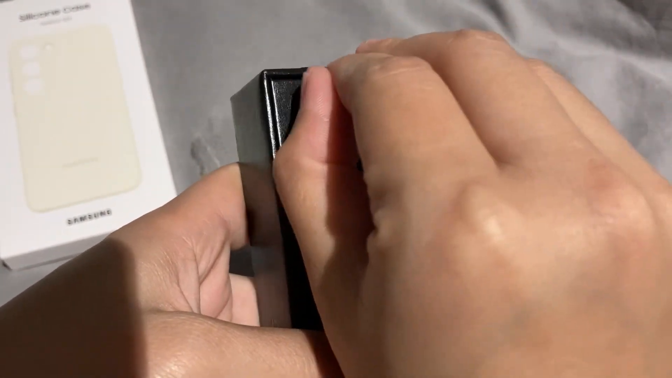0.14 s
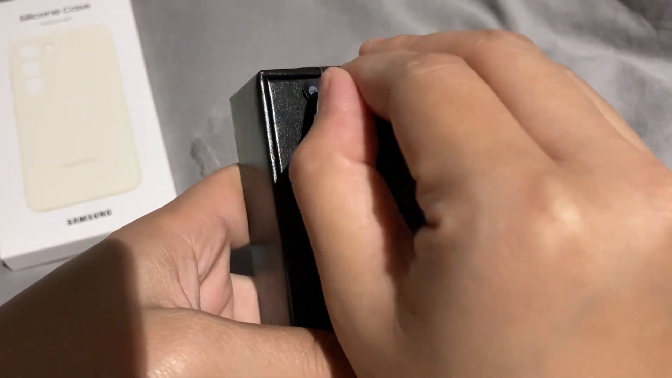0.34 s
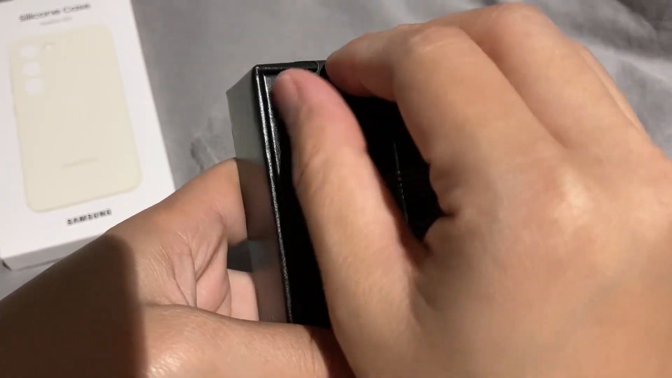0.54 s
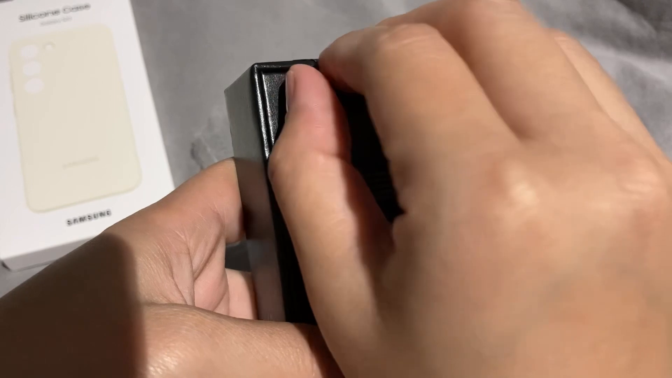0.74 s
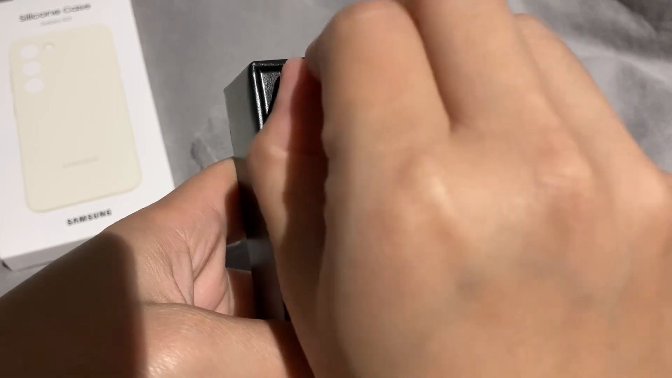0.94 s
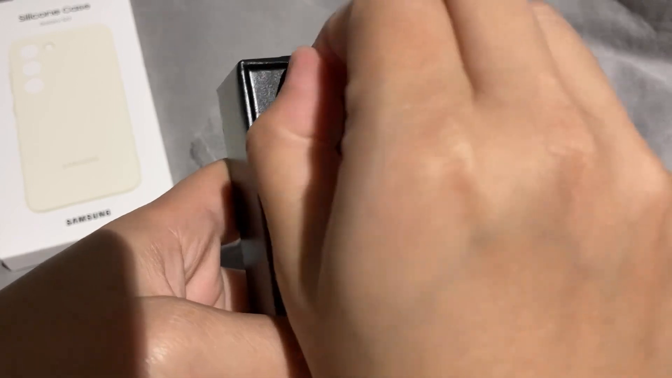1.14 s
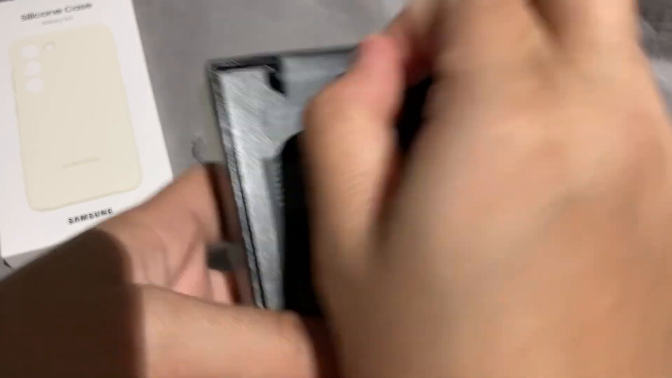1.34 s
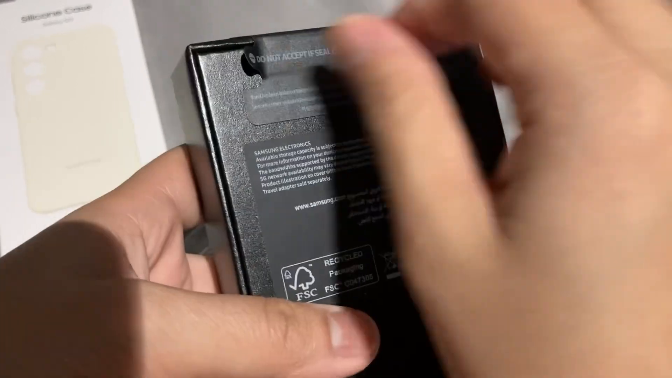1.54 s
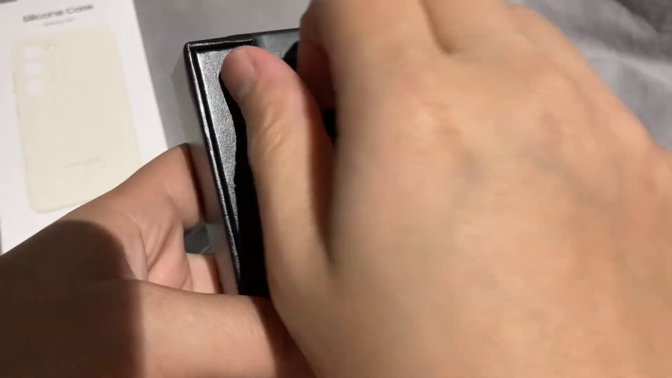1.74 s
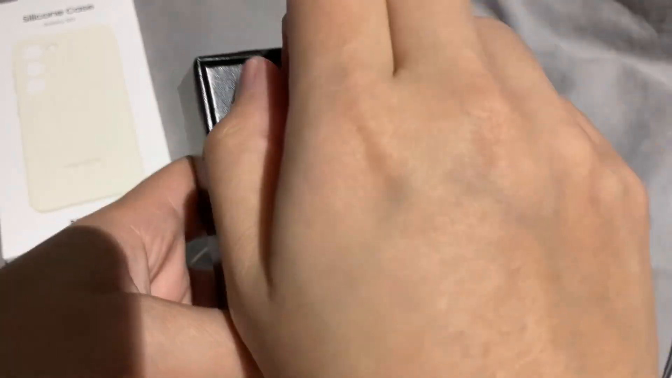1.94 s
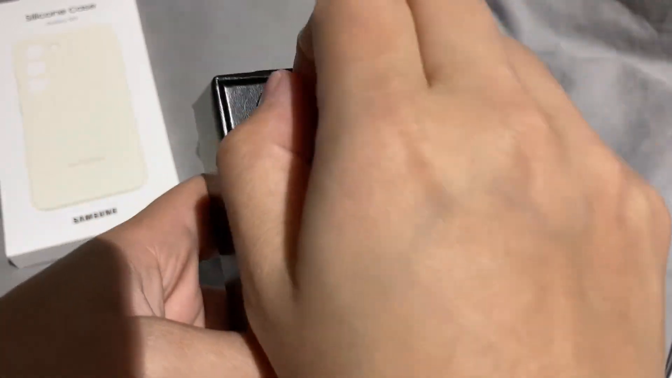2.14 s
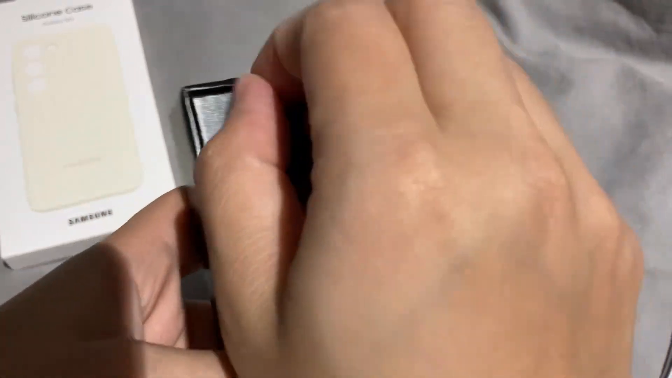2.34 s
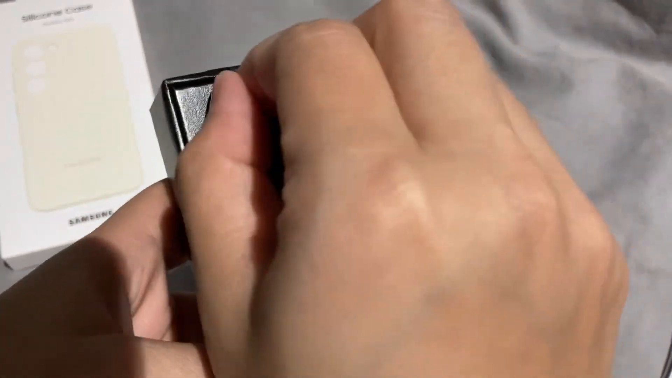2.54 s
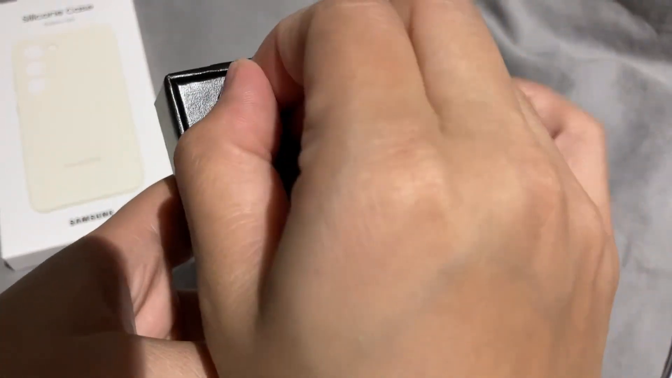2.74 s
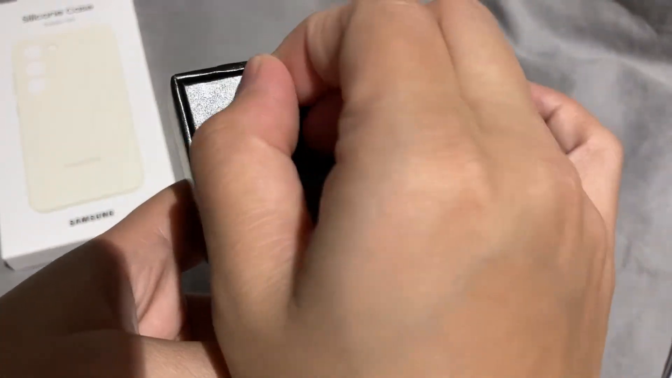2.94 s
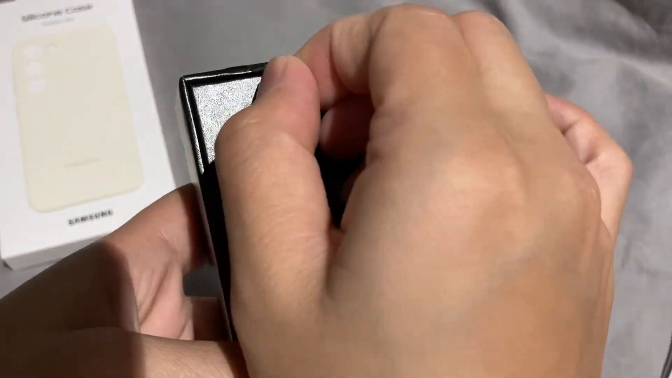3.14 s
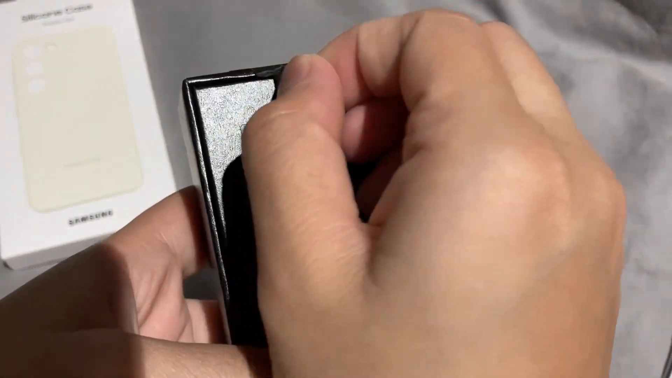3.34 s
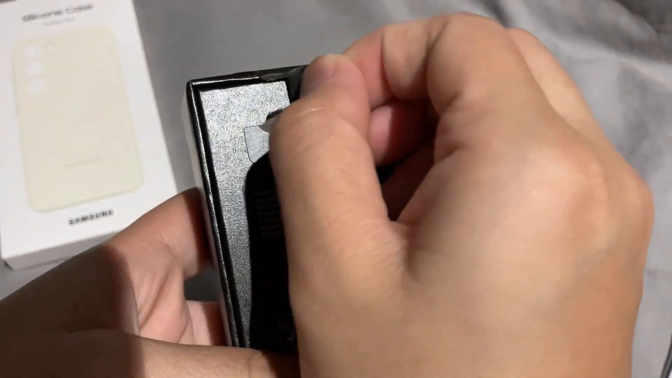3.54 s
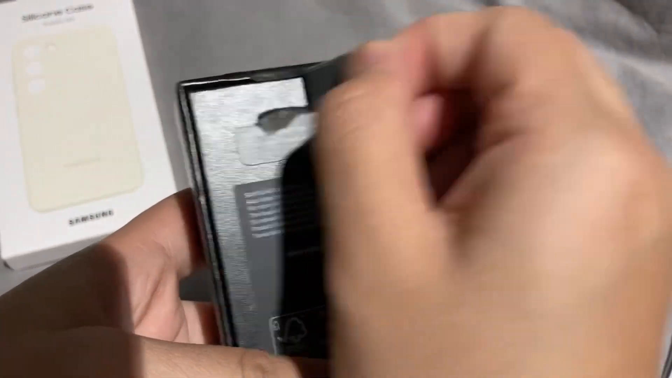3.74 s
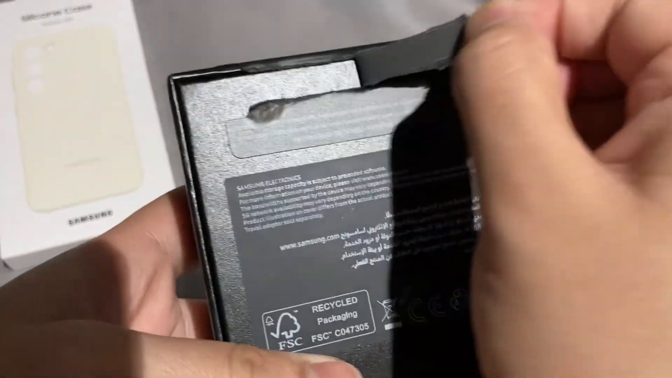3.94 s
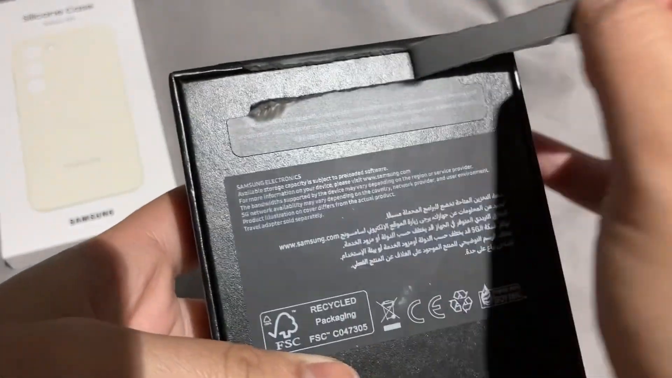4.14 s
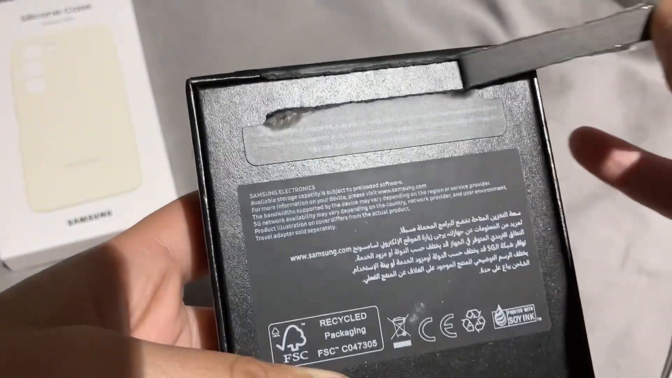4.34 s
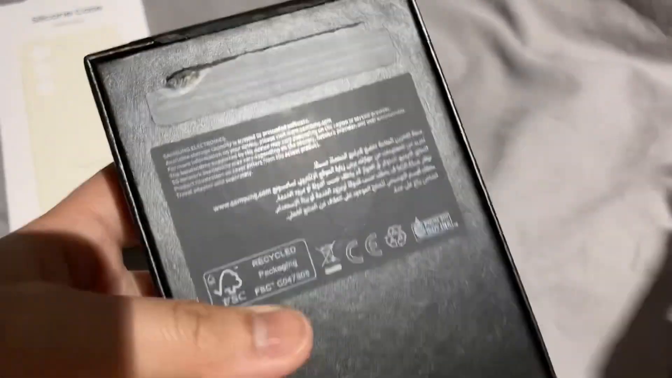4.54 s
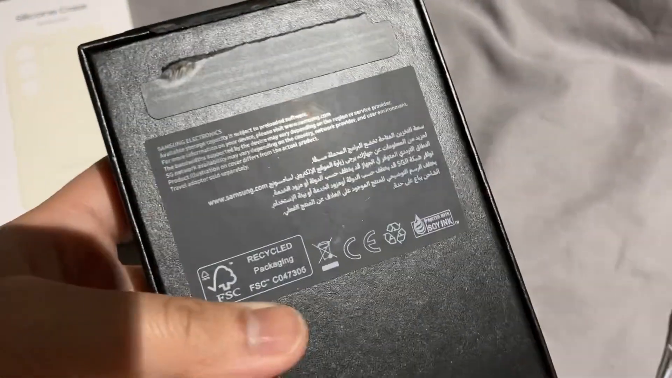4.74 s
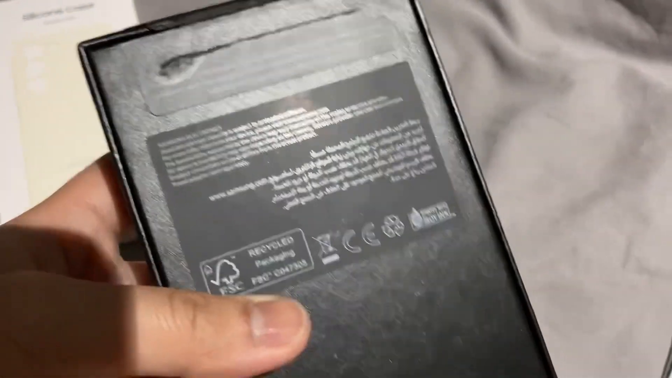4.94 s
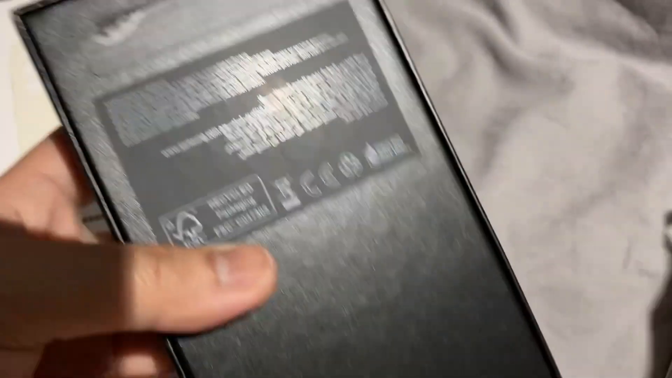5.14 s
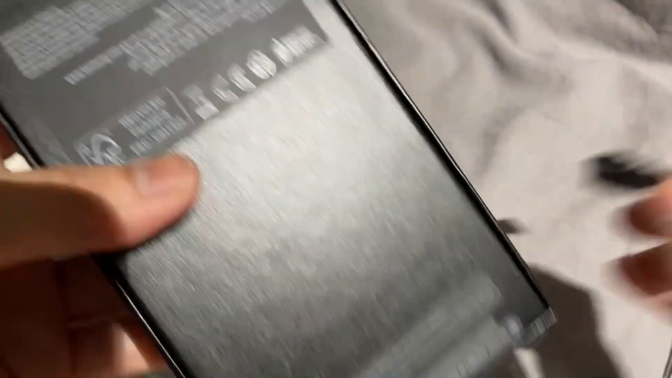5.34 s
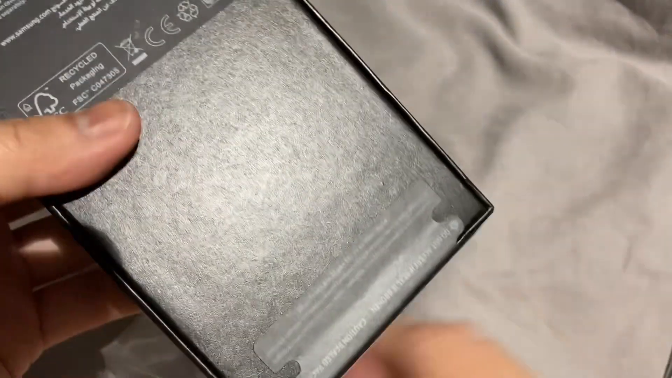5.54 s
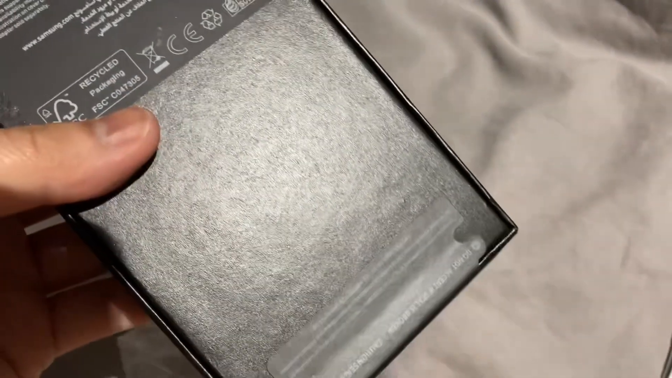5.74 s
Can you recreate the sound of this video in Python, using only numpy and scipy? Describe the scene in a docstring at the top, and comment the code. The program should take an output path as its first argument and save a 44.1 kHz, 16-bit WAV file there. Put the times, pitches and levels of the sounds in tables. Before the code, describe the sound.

Very close stereo capture of hands on a small hollow cardboard box in a quiet furnished room. Faint finger rubs and sharp nail clicks come first, with one solid knock near one second. Picking at a paper seal grows from faint crackle to dense hiss, then a bright rip runs and snaps off. After a pause, fingers tap and brush the card.

```python
"""Opening a sealed cardboard box

Two hands open a small cardboard box close to a pair of microphones in a quiet furnished room.
Fingers tap and slide over the card, pick at the paper seal, then peel it off in one long rip.
The strip snaps free, the hollow box knocks, and a hand brushes along it.
Paper is coloured bursts of noise, the box is damped modes, and the room is a short diffuse tail."""
import sys
import numpy as np
from scipy import signal
from scipy.fft import rfft, irfft
from scipy.io import wavfile
from scipy.ndimage import uniform_filter1d, map_coordinates

SR = 44100
rng = np.random.default_rng(int(sys.argv[2]) if len(sys.argv) > 2 else 0)


def transcribe(signal):
    """Save signal, clipped to [-1, 1], as a 16-bit WAV file at the path in sys.argv[1]."""
    frames = np.atleast_2d(signal).T
    limited = np.clip(frames, -1, 1)
    pcm = np.round(limited * 32767).astype(np.int16)
    wavfile.write(sys.argv[1], SR, pcm)


N = 255339
TIME = np.arange(N) / SR
FREQS = np.fft.rfftfreq(N, 1 / SR)

# The still room's spectrum. Each row: frequency in Hz, relative level in dB per Hz.
ROOM_TONE_SPECTRUM = [(15, -15), (32, -16), (48, 6), (65, -7.5), (120, -8), (200, -19), (320, -26.5),
                      (600, -33), (1500, -40), (5000, -47.5), (10000, -47), (14000, -48.5), (16000, -59)]
ROOM_TONE_DB = -62  # RMS level
# The loudest breaks of paper fibre and flicks of a fingernail.
# Each row: start in seconds, relative energy in dB.
FIBRE_SNAPS = [(0.0702, -44), (0.1802, -1), (1.0844, -23), (1.3005, -11), (1.6127, -35), (1.7469, -34),
               (1.872, -37), (2.6851, -28), (2.7597, -24), (2.7927, -29), (2.8756, -29), (2.919, -26),
               (2.9233, -22), (2.9486, -26), (2.9951, -26), (3.1026, -28), (3.1717, -17), (3.2439, -24),
               (3.2765, -22), (3.3224, -15), (3.3385, -14), (3.4149, -26), (3.4526, -23), (3.4811, -16),
               (3.5042, -15), (3.6127, -14), (3.6851, -20), (3.7021, -5), (3.7153, -9), (3.7274, -11),
               (4.1604, -13), (4.2982, -19), (4.396, -10), (5.5496, -23), (5.6094, -18)]
SNAP_DECAY_S = .00037
# Blows and tugs on the box. Each row: start in seconds, relative energy of the lid in dB,
# relative energy of the whole box in dB, pitch of the lid under the grip in Hz.
BOX_KNOCKS = [(0.071, -41.5, -27, 1437), (0.1812, -26, -15.5, 1570), (1.0852, -7.5, 2.5, 1194),
              (1.136, -23.5, -17, 1100), (1.3002, -15.5, -22, 1100), (1.3127, -17.5, -9, 1012),
              (1.6109, -37, -28, 1300), (1.7473, -35.5, -45.5, 1390), (1.8731, -30.5, -30, 1205),
              (2.892, -11.5, -8.5, 1161), (3.0211, -16, -13.5, 1164), (3.173, -30, -50, 1500),
              (3.7468, -6.5, -6, 1072), (4.1191, -15, -27, 1067), (4.1562, -25, -19, 949),
              (4.2988, -16.5, -22.5, 1074), (4.396, -4.5, -24, 1017), (4.3983, -12.5, -9, 1148),
              (5.5497, -20, -48, 1430), (5.5947, -18.5, -16.5, 1356), (5.6105, -20.5, -49, 1352),
              (5.6404, -25.5, -23, 1485), (5.6553, -27.5, -18.5, 1570)]
# Modes of the stiff lid. Each row: multiple of the lid pitch, relative level in dB, T60 in seconds.
LID_MODES = [(.6, -17.5, 0.033), (.76, -1, 0.026), (.93, 14, 0.012), (1.13, 16.5, 0.011),
             (1.45, -3.5, 0.019), (1.95, -5.5, 0.026)]
# Low modes of the filled box in the hand, before tuning.
# Each row: frequency in Hz, relative level in dB, T60 in seconds.
BOX_MODES = [(145, -21.5, 0.031), (182, 1, 0.056), (259, 7, 0.029), (347, 2, 0.039), (429, -0.5, 0.029),
             (677, 2.5, 0.011)]
# Strokes of a finger over the card. Each row: hardest press in seconds, swell in seconds,
# fade in seconds, relative hiss in dB, relative drumming of the lid in dB.
FINGER_STROKES = [(0.489, 0.015, .03, -74, -79), (0.553, .04, 0.014, -62, -80),
                  (.77, 0.055, .07, -72.5, -82.5), (.87, 0.11, 0.065, -59.5, -94.5),
                  (1.206, 0.084, 0.071, -59.5, -88), (1.299, 0.014, 0.007, -32.5, -47),
                  (1.402, 0.029, 0.041, -55.5, -81), (1.613, 0.0063, 0.027, -57.5, -56),
                  (1.691, 0.061, 0.027, -67.5, -57.5), (1.77, 0.11, 0.037, -70.5, -77),
                  (2.28, 0.085, .06, -63, -79), (2.38, 0.086, .04, -66.5, -98),
                  (2.46, 0.042, 0.044, -71.5, -101), (5.552, 0.0085, 0.041, -48.5, -54),
                  (5.615, 0.035, 0.035, -47, -57.5), (5.646, 0.043, 0.062, -42.5, -56.5),
                  (5.757, 0.096, 0.081, -53, -70)]
STROKE_EDGE_DB = -19.5  # level one swell before and one fade after the hardest press
# Short pulls that work the end of the seal loose. Each row: hardest pull in seconds,
# swell in seconds, fade in seconds, relative hiss in dB.
SEAL_PULLS = [(2.698, 0.014, 0.14, -70), (2.79, 0.05, 0.076, -65.5), (2.965, .14, 0.1, -53.5),
              (3.191, 0.093, 0.036, -50.5), (3.3, 0.21, 0.087, -58), (3.374, 0.11, 0.072, -48.5),
              (3.53, 0.087, 0.2, -44.5), (3.59, 0.045, 0.092, -44.5)]
PULL_EDGE_DB = -15  # level one swell before and one fade after the hardest pull
# The strip running off in one long rip.
# Each row: time in seconds, relative hiss in dB, relative rasp in dB.
LONG_RIP = [(3.72, -41, -59), (3.736, -42.5, -52), (3.78, -40.5, -51), (3.842, -53, -63.5),
            (3.954, -47, -58.5), (4.004, -45.5, -65), (4.104, -45, -50.5), (4.14, -48, -56),
            (4.158, -43, -52.5), (4.266, -54.5, -68), (4.38, -46.5, -55), (4.4, -38, -45)]
RIP_STOP_S = 0.0078  # time constant of the rip's start and stop
# Picking turns into running: start in seconds, end in seconds.
LOOSENING_SPAN = [3.4, 3.75]
# The hands shifting the weight of the box.
# Each row: start in seconds, envelope peak in dB, pitch in Hz.
HAND_BUMPS = [(2.859, -54, 111), (3.045, -50.5, 66.4), (3.801, -51.5, 153), (5.573, -48, 188),
              (5.613, -51.5, 149), (5.656, -53, 71)]

# Colour of a crisp paper break. Each row: frequency in Hz, relative level in dB per Hz.
CRISP_COLOUR = [(200, -31), (1200, -19.5), (2600, -20), (4500, -19), (6000, -12.5), (8300, -4),
                (10000, -5.5), (12000, -4), (15000, -4.5), (17000, -21)]
# Colour of rasping card. Each row: frequency in Hz, relative level in dB per Hz.
RASP_COLOUR = [(1200, -46.5), (2200, -8.5), (3000, 1), (4300, 1.5), (5600, -8), (6800, 2.5), (9000, -8.5)]
# Colour of skin on card. Each row: frequency in Hz, relative level in dB per Hz.
SKIN_COLOUR = [(3000, -32.5), (6000, -22.5), (7200, -6), (8500, -0.5), (10000, -5.5), (12000, -1.5),
               (15300, -8.5), (16200, -22.5)]
# The lid drumming under a sliding finger. Each row: frequency in Hz, relative level in dB per Hz.
DRUMMING_COLOUR = [(100, -22), (250, -15), (600, -22), (900, -11), (1250, 0), (1750, -6), (2500, -17),
                   (5000, -45)]
# Colour of peeling paper's hiss. Each row: frequency in Hz, relative level in dB per Hz.
HISS_COLOUR = [(3000, -29), (6000, -12), (7200, 1.5), (8500, 3), (9500, 0), (11500, 13), (13000, 2.5),
               (15200, 9.5), (16000, -34.5), (17000, -29.5)]
# The hollow box answering the peel. Each row: frequency in Hz, relative level in dB per Hz.
HOLLOW_COLOUR = [(80, 1), (170, -5.5), (350, -5), (550, -1.5), (850, -5.5), (1200, 7), (1600, 3.5),
                 (2000, -0.5), (2700, -20.5), (5000, -33.5)]

# How far the left microphone leads for sound from the box.
# Each row: frequency in Hz, phase in radians.
LEFT_LEAD = [(0, 0), (1200, -.4), (3200, -3.14), (16000, 21.6)]
# Shading between the microphones. Each row: frequency in Hz, left minus right in dB.
LEFT_BALANCE = [(100, -4), (300, -2.5), (600, -7.5), (1100, -10.5), (2000, -3), (4000, -3.5), (8000, 0.05),
                (16000, 0)]
# Decay of the room. Each row: frequency in Hz, T60 in seconds.
ROOM_DECAY = [(150, 0.38), (1000, 0.14), (4000, 0.23), (9000, 0.15), (16000, 0.087)]
EDGE_HZ = 16800


def amp(db):
    """Decibels to gain."""
    return 10 ** (np.asarray(db) / 20)


def unit(x):
    """Scales a short sound to an energy of one."""
    return x / np.sqrt(np.sum(x ** 2) + 1e-20)


def read(points, hz):
    """Reads a table on a logarithmic frequency axis."""
    f, value = np.transpose(points)
    return np.interp(np.log(hz + 1), np.log(f + 1), value)


def add(track, s, sound):
    """Adds a sound to a track at time s."""
    part = track[round(s * SR):][:len(sound)]
    part += sound[:len(part)]


def colour(x, spectrum, size=2048):
    """Causal minimum-phase filter of unit energy with the given spectrum."""
    hz = abs(np.fft.fftfreq(size, 1 / SR))
    log_gain = np.log(amp(read(spectrum, hz)))
    minimum_phase = np.exp(np.conj(signal.hilbert(log_gain)))
    response = np.fft.ifft(minimum_phase).real[:size // 2]
    return signal.oaconvolve(x, unit(response))[:len(x)]


def room_tone():
    """Low rumble common to both microphones, and a faint separate hiss in each."""
    z = rfft(rng.standard_normal((3, N)))
    # share of the power common to both microphones, by frequency in Hz
    same = read([(40, .985), (110, .94), (300, .7), (900, .15)], FREQS)
    mixed = np.sqrt(same) * z[0] + np.sqrt(1 - same) * z[1:]
    tone = irfft(mixed * amp(read(ROOM_TONE_SPECTRUM, FREQS)), N)
    return amp(ROOM_TONE_DB) * tone / tone.std()


def snaps(gain_db, size=1024):
    """Each break is a very short broadband burst with a faint, longer flutter behind it."""
    out, t = np.zeros(N), np.arange(size) / SR
    lead_in = 16  # samples of room for what the flattening spreads ahead of the burst
    flutter = amp(-26) * np.exp(-t / .003)
    envelope = np.exp(-t / SNAP_DECAY_S) + flutter
    for s, db in FIBRE_SNAPS:
        z = rfft(envelope * rng.standard_normal(size))
        # flatten the spectrum, so that the card alone gives the burst its colour
        even = z / np.sqrt(uniform_filter1d(abs(z) ** 2, size=24))
        burst = np.roll(irfft(even), lead_in)
        add(out, s - lead_in / SR, amp(db + gain_db) * unit(colour(burst, CRISP_COLOUR)))
    return out


def ring(modes, t, pitch):
    """Damped modes, their frequencies scaled by pitch."""
    return sum(amp(db - 60 * t / t60) * np.sin(2 * np.pi * f * pitch * t) for f, db, t60 in modes)


def bending(x, delay_s):
    """Bending waves in card travel as the root of frequency, so a knock sweeps downward."""
    # delay_s is the travel time at 1 kHz; taking it off again keeps 1 kHz in place
    phase = 4 * np.pi * delay_s * np.sqrt(FREQS * 1000)
    return irfft(rfft(x) * np.exp(-1j * (phase - 2 * np.pi * FREQS * delay_s)), N)


def knocks(lid_db, box_db, crack_db, box_lag_s, soft_hz, lid_low_hz, box_low_hz):
    """A dry crack at the contact; the lid rings first and the slower bending of the box follows."""
    body, cracks, t = np.zeros(N), np.zeros(N), np.arange(5000) / SR
    # soft contact rounds the attack, and a small panel cannot radiate low notes
    lid_band = signal.butter(2, [lid_low_hz, soft_hz], "bandpass", fs=SR, output="sos")
    box_band = signal.butter(2, [box_low_hz, soft_hz], "bandpass", fs=SR, output="sos")
    box_ring = unit(signal.sosfilt(box_band, ring(BOX_MODES, t, 0.99)))
    for s, lid, box, hz in BOX_KNOCKS:
        lid_ring = unit(signal.sosfilt(lid_band, ring(LID_MODES, t, hz)))
        crack = unit(np.exp(-t / 0.0027) * rng.standard_normal(len(t)))
        add(body, s, amp(lid + lid_db) * lid_ring)
        add(body, s + box_lag_s, -amp(box + box_db) * box_ring)
        add(cracks, s, amp(lid + crack_db) * crack)
    return bending(body, delay_s=.0016) + colour(cracks, RASP_COLOUR)


def swell(s, rise_s, fall_s, edge_db):
    """A press of the hand grows exponentially up to time s and dies away again."""
    away = np.maximum((s - TIME) / rise_s, (TIME - s) / fall_s)
    return amp(edge_db * np.minimum(away, 8))


def grains(per_s, spread_db, smooth, order=700):
    """Three noises of tiny uneven bursts over a smooth hiss, with a steady mean power near one."""
    struck = rng.exponential(1, N)
    sizes = amp(spread_db * np.minimum(struck, 4)) * (rng.random(N) < per_s / SR)
    power = signal.lfilter([1], [1, -np.exp(-1 / (.00016 * SR))], sizes ** 2)
    # level out by the local mean over a window of order samples
    power /= abs(uniform_filter1d(uniform_filter1d(power, order), order)) + 1e-9
    smooth = np.clip(smooth, 0, 1)
    return np.sqrt(smooth + (1 - smooth) * power) * rng.standard_normal((3, N))


def slides(hiss_db, rasp_db, hollow_db):
    """Skin hisses over the card's grain; its small slips drum on the lid; rasp grows with both."""
    hiss, hollow = np.zeros((2, N))
    for s, rise, fall, skin_db, drum_db in FINGER_STROKES:
        press = swell(s, rise, fall, STROKE_EDGE_DB)
        hiss = np.hypot(hiss, amp(skin_db) * press)
        hollow = np.hypot(hollow, amp(drum_db) * press)
    rasp = np.sqrt(hiss * hollow)
    skin_grain, rasp_grain, _ = grains(2500, spread_db=4.5, smooth=0.3)
    slips = grains(490, spread_db=-5.5, smooth=0.21)[0]
    skin = amp(hiss_db) * colour(skin_grain * hiss, SKIN_COLOUR)
    scrape = amp(rasp_db) * colour(rasp_grain * rasp, RASP_COLOUR)
    drumming = amp(hollow_db) * colour(slips * hollow, DRUMMING_COLOUR)
    return skin + scrape + drumming


def picked_to_running(picked, running):
    """Moves a quantity from its value while the seal is picked to its value once the strip runs."""
    return np.interp(TIME, LOOSENING_SPAN, [picked, running])


def peel_effort(rip_db):
    """How fast the seal lets go: a few short pulls, then the hiss and rasp of the long rip."""
    s, *levels = np.transpose(LONG_RIP)
    outside = np.clip(np.maximum(s[0] - TIME, TIME - s[-1]) / RIP_STOP_S, 0, 20)
    rip, rip_rasp = (amp(rip_db + np.interp(TIME, s, db)) * np.exp(-outside) for db in levels)
    pull_power = np.zeros(N)
    for at, rise, fall, level in SEAL_PULLS:
        pull_power += (amp(level) * swell(at, rise, fall, PULL_EDGE_DB)) ** 2
    return np.sqrt(pull_power), rip, rip_rasp


def crackle(effort, order=3000):
    """Single fibres break out of the seal: widely uneven while picked, more alike as it runs."""
    per_s, spread_db = picked_to_running(100, 220), picked_to_running(4.5, 3.5)
    struck = rng.exponential(1, N)
    sizes = amp(spread_db * np.minimum(struck, 2.5)) * (rng.random(N) < per_s / SR)
    # level out by the local mean power over a window of order samples
    sizes /= np.sqrt(abs(uniform_filter1d(sizes ** 2, order)) + 1e-4)
    window = signal.windows.hann(14)
    bursts = np.sqrt(signal.lfilter(window / window.sum(), [1], sizes ** 2))
    breaks = effort * bursts * rng.standard_normal(N)
    running = picked_to_running(0, 1)
    return colour(breaks * (1 - running), CRISP_COLOUR) + colour(breaks * running, HISS_COLOUR)


def peel(hiss_db, pull_hiss_db, fibre_db, pull_rasp_db, rip_rasp_db, pull_hollow_db, rip_hollow_db,
         box_growth):
    """Glue lets go in tiny jerks, sparse at first and dense as the strip runs; the box answers."""
    pulls, rip, rip_rasp = peel_effort(rip_db=4)
    hiss_grain, rasp_grain, hollow_grain = grains(
        picked_to_running(400, 2200), spread_db=3.5, smooth=picked_to_running(.05, .25))
    hiss = amp(pull_hiss_db) * pulls + amp(hiss_db) * rip
    # the card answers a harder pull less than the glue does
    strain = pulls.max() * (pulls / pulls.max()) ** box_growth
    rasp = amp(pull_rasp_db) * strain + amp(rip_rasp_db) * rip_rasp
    hollow = amp(pull_hollow_db) * strain + amp(rip_hollow_db) * rip
    fibres = crackle(amp(fibre_db) * (pulls + rip))
    paper = colour(hiss_grain * hiss, HISS_COLOUR) + fibres
    card = colour(rasp_grain * rasp, RASP_COLOUR) + colour(hollow_grain * hollow, HOLLOW_COLOUR)
    return paper + card


def bumps(rise_s):
    """The soft flesh of the hand gives a dull push of a few cycles."""
    out, t = np.zeros(N), np.arange(9000) / SR
    for s, db, hz in HAND_BUMPS:
        u = t / rise_s * hz / 100  # rise_s holds at 100 Hz; higher bumps are quicker
        add(out, s, amp(db) * u * np.exp(1 - u) * np.sin(2 * np.pi * hz * t))
    return out


def pair(x):
    """The two microphones hear the box with different delay and shading."""
    lead = np.interp(FREQS, *np.transpose(LEFT_LEAD))
    left = amp(read(LEFT_BALANCE, FREQS) / 2) * np.exp(.5j * lead)
    ports = np.array([left, 1 / left])
    mean_gain = np.sqrt(np.mean(abs(ports) ** 2, 0))
    return irfft(rfft(x) * ports / mean_gain, N)


def off_the_hands(x, share, nearest_s, farthest_s, count=16):
    """Echoes off moving hands comb the sound with shifting ripples, different at each microphone."""
    moments = np.linspace(0, TIME[-1], count)
    paths = rng.uniform(nearest_s, farthest_s, (2, 2, count))  # microphone, hand, moment
    echoes = np.zeros((2, N))
    for echo, port, hands in zip(echoes, x, paths):
        for delays in hands:
            position = (TIME - np.interp(TIME, moments, delays)) * SR
            echo += map_coordinates(port, [position], order=3)
    return (x + share * echoes) / np.sqrt(1 + 2 * share ** 2)


def room(x, wet_db, size=22050):
    """A short diffuse tail that builds over the first milliseconds and decays by frequency."""
    hz, t, z = signal.stft(rng.standard_normal((2, size)), SR, nperseg=256)
    decay = amp(-60 * t / read(ROOM_DECAY, hz)[:, None])
    tail = signal.istft(z * decay, SR, nperseg=256)[1][:, :size]
    tail *= np.clip(np.arange(size) / SR / .005, 0, 1)
    # unit energy is shared by two microphones, so the root of two restores it in each
    return signal.fftconvolve(x[None], np.sqrt(2) * amp(wet_db) * unit(tail), axes=1)[:, :N]


def scene():
    """Paper noise and knocks, direct and through the room, over the room tone."""
    paper = peel(hiss_db=-1.5, pull_hiss_db=-2.5, fibre_db=-5.0, pull_rasp_db=-18, rip_rasp_db=2.5,
                 pull_hollow_db=-20, rip_hollow_db=-14.5, box_growth=0.53)
    paper = paper + slides(hiss_db=-2.5, rasp_db=0, hollow_db=4)
    clicks = snaps(gain_db=-1)
    box = knocks(lid_db=-1.0, box_db=-9.5, crack_db=-16, box_lag_s=0.00062,
                 soft_hz=2413, lid_low_hz=486, box_low_hz=152.5)
    near_paper = off_the_hands(pair(paper), share=.33, nearest_s=.0004, farthest_s=.0018)
    direct = near_paper + pair(clicks + box + bumps(rise_s=0.013))
    reflected = room(paper, wet_db=-14.5) + room(clicks, wet_db=-14.0) + room(box, wet_db=-11.5)
    return direct + reflected + room_tone()


def record(dry):
    """A steep linear-phase low-pass sets the upper band limit."""
    low_pass = signal.firwin(511, EDGE_HZ, window=("kaiser", 9), fs=SR)
    return signal.oaconvolve(dry, low_pass[None], "same")


dry = scene()
out = record(dry)
transcribe(out)
```